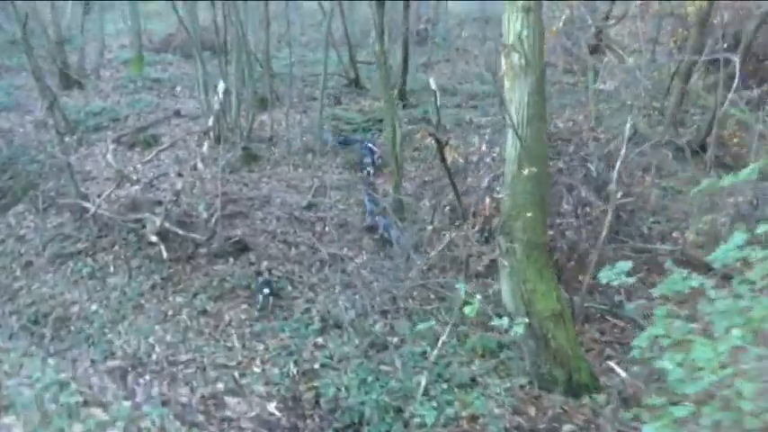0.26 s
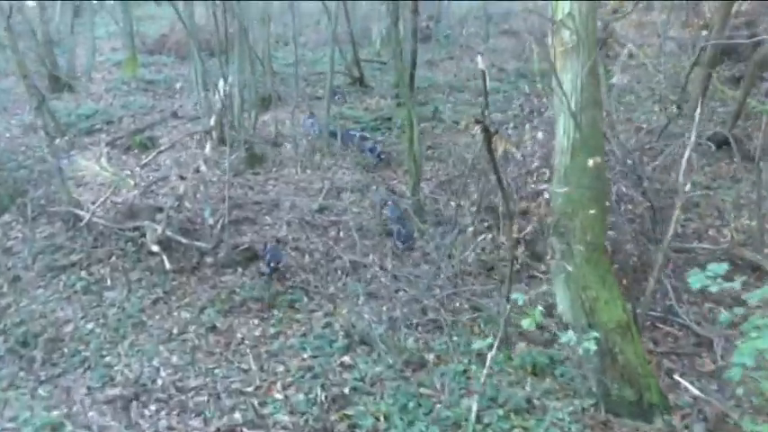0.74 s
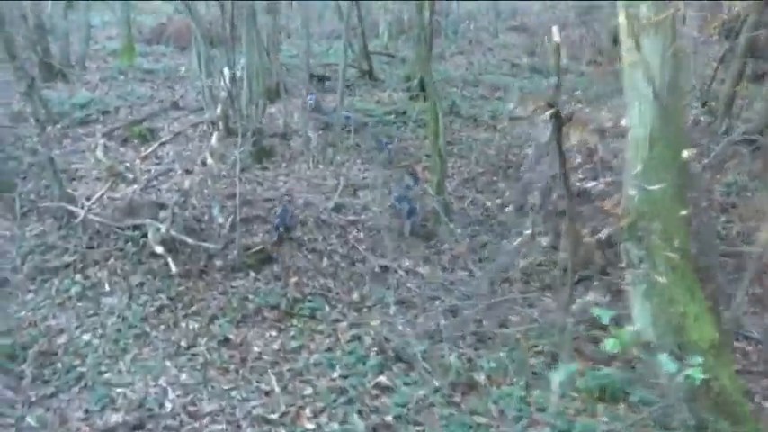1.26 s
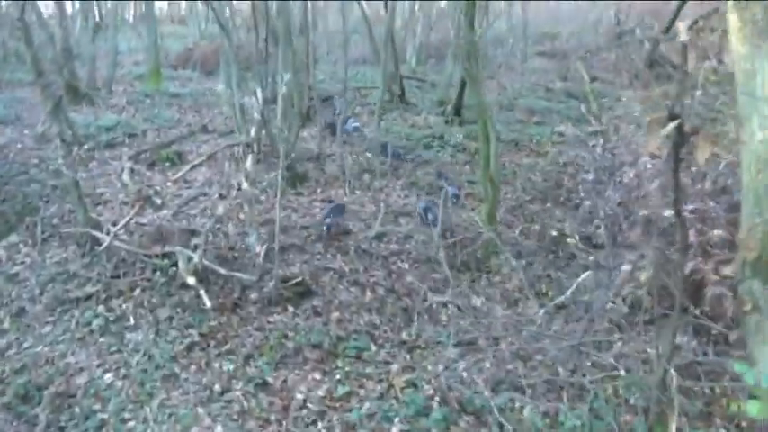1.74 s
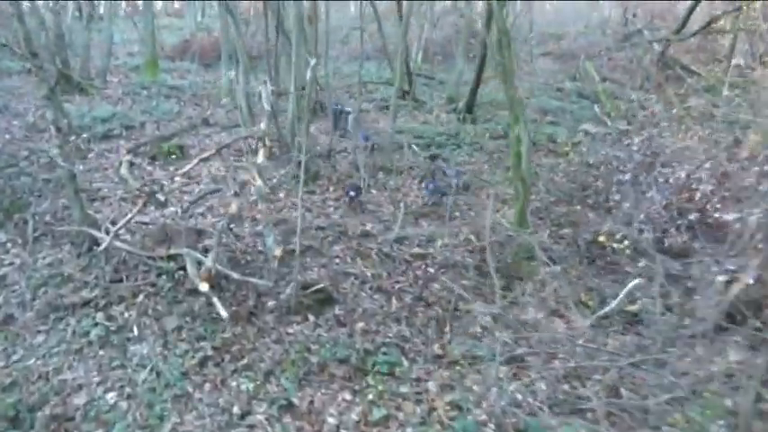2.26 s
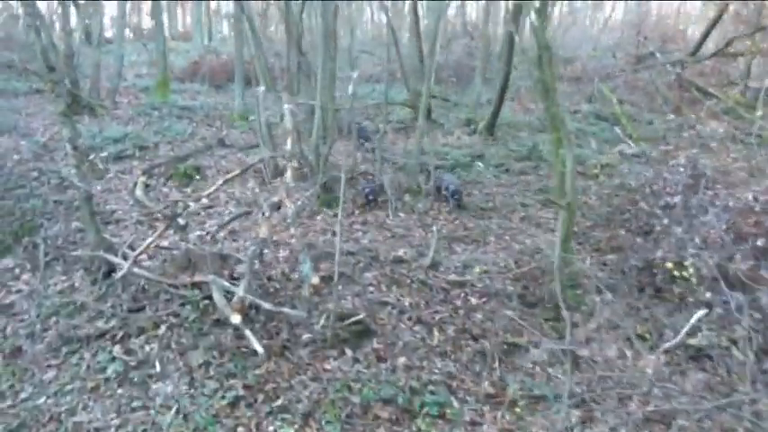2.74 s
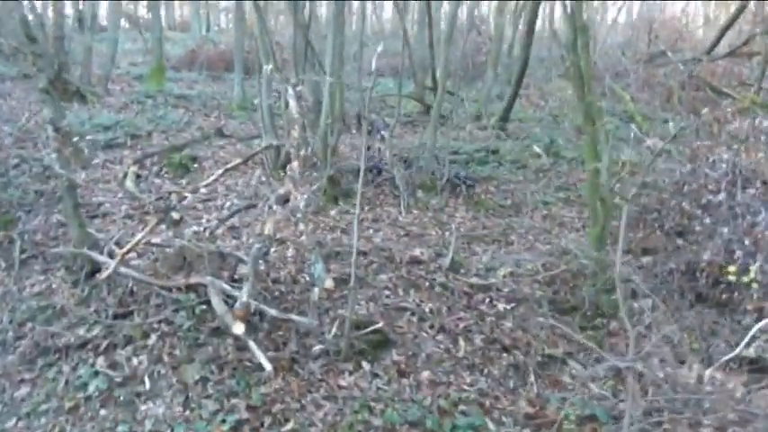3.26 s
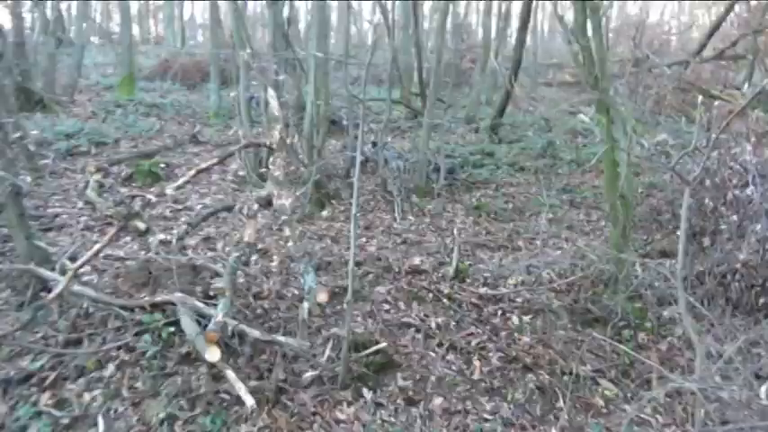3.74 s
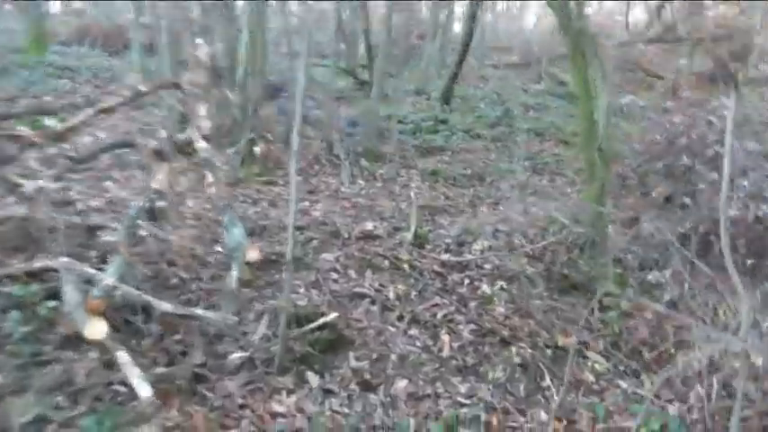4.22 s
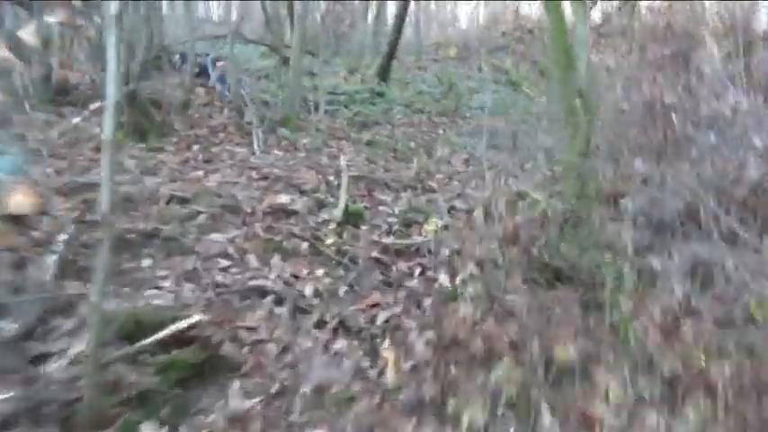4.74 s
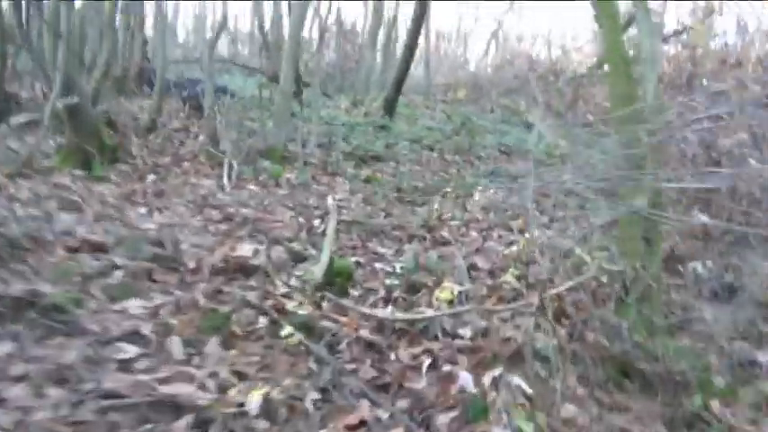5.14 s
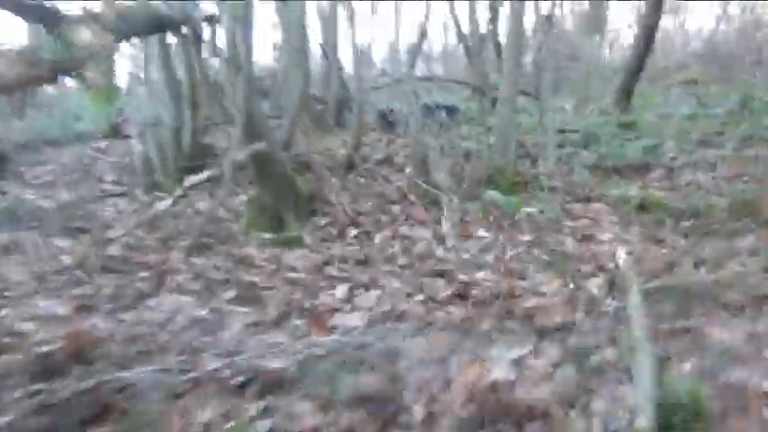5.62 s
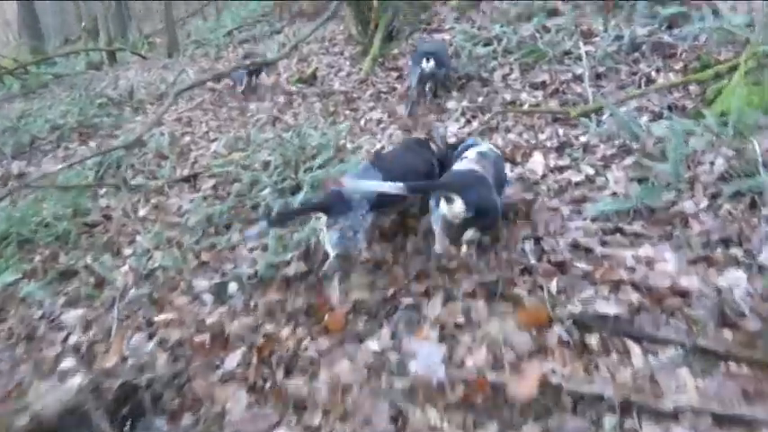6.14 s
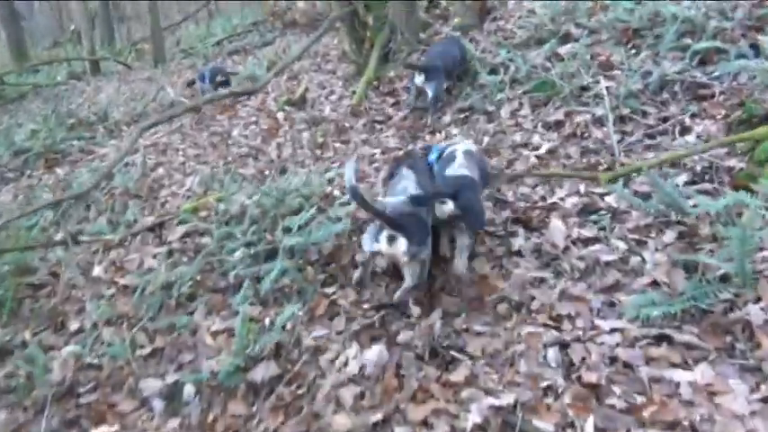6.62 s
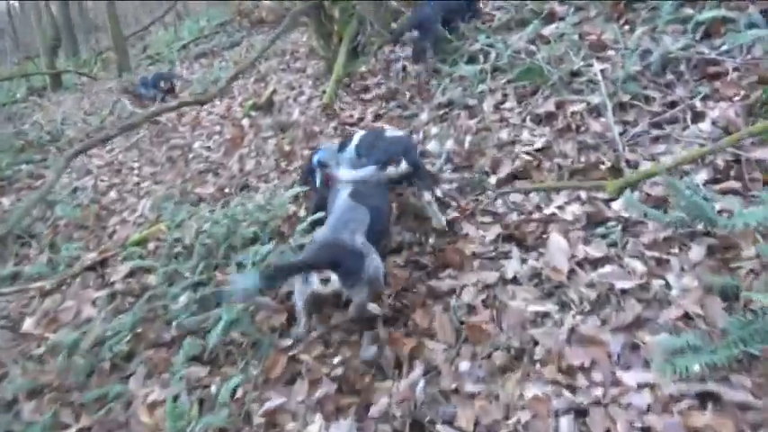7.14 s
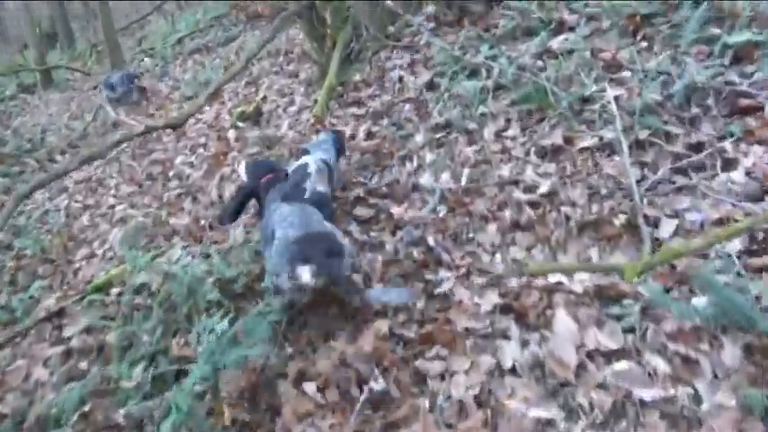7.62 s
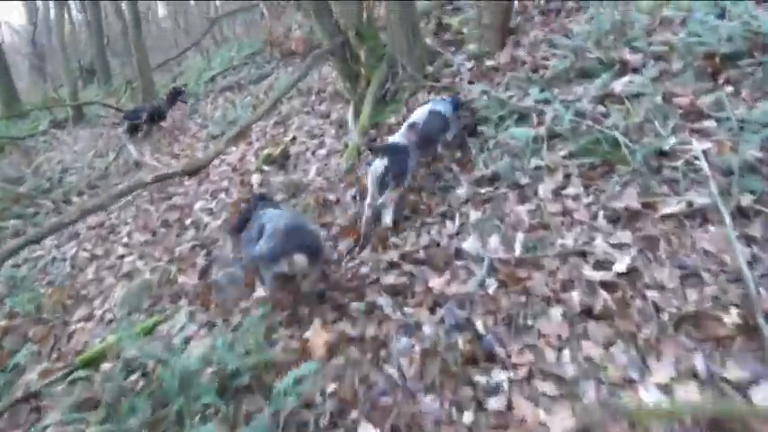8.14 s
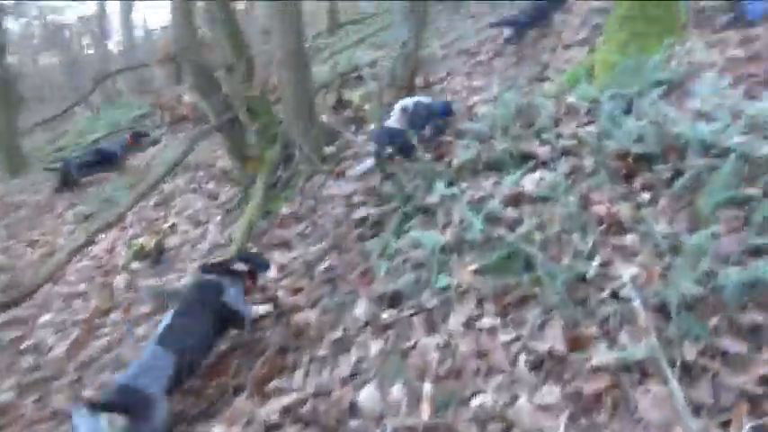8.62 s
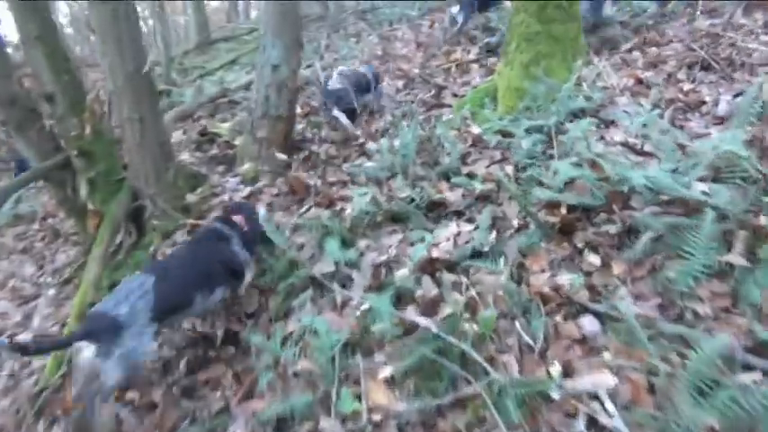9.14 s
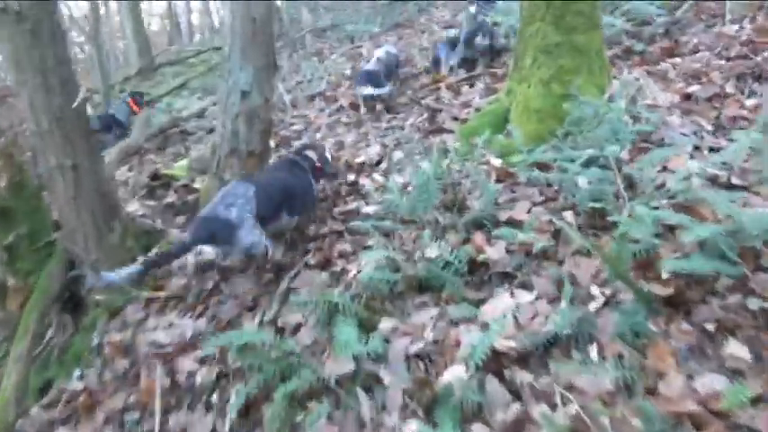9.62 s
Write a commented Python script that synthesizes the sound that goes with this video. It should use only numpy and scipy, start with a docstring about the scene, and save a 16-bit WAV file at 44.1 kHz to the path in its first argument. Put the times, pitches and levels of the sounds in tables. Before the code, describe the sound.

A pack of hounds bays ahead in a wood, short hoarse howls overlapping with higher cries and echoing among the trunks. One hound gives a rough growling bay. The voices then mostly pause as boots crunch dry leaves and snap twigs close to the microphone. A nearer hound holds one long note, and the pack starts up again. Collar bells jingle faintly throughout.

```python
"""Hounds hunting in a wood

A pack bays in overlapping howls and cries, hoarse where the vocal folds repeat only every few cycles.
One hound growls; later one holds a long note. Clappers ring the collar bells, leaves rustle and twigs
snap under paws and boots, and the trunks scatter the voices. The sound cuts out once, briefly."""
import sys
import numpy as np
from scipy import signal
from scipy.fft import rfft, irfft, next_fast_len
from scipy.io import wavfile
from scipy.ndimage import uniform_filter1d, minimum_filter1d, map_coordinates

SR = 44100
rng = np.random.default_rng(int(sys.argv[2]) if len(sys.argv) > 2 else 0)


def output_pcm(signal):
    """Save a mono or channel-first signal as 16-bit PCM at the path in sys.argv[1].

    Samples are clipped to [-1, 1] before scaling.
    """
    pcm = np.clip(np.atleast_2d(signal).T, -1, 1) * 32767
    wavfile.write(sys.argv[1], SR, np.round(pcm).astype(np.int16))


N = 435266

# low howls: t/s, length/s, start, middle, end f/Hz, fundamental/dB, swell/dB, octave/dB,
# overtones/dB, roughness
HOWLS = [(0, 0.24, 460.4, 432.7, 405, -14.5, -13, -31.5, -36.5, 0.55),
         (0.17, 0.34, 389, 385.2, 386.5, -26.5, -8, -20.5, -31, 0.27),
         (0.48, 0.2, 384.3, 408.3, 437, -22.5, -1.5, -46, -36, 1),
         (0.63, 0.27, 458.5, 496.5, 438, -22.5, -13, -38, -45, 0.98),
         (0.72, 0.36, 371.6, 347.6, 401, -36.5, 8.5, -25, -41, 0.44),
         (0.86, 0.4, 452.7, 493.5, 447, -20.5, -6, -36, -32, 0.32),
         (1.27, 0.19, 461, 405.3, 342, -34.5, 4, -49, -30, 0.64),
         (1.5, 0.32, 455.3, 427.5, 392.5, -19, -1, -46, -31, 0.51),
         (1.77, 0.21, 476, 489.6, 430, -19.5, -12, -33.5, -39, 0.58),
         (2.02, 0.19, 481.4, 436, 420, -19, 4.5, -32, -31, 0.76),
         (2.2, 0.38, 459.6, 469.5, 483.4, -20, 5.5, -47.5, -34, 0.99),
         (2.67, 0.26, 526, 507.5, 493, -21, 5.5, -37, -33, 0.64),
         (2.91, 0.14, 448.5, 500.5, 538, -21, 1, -26, -47, 0.98),
         (3.03, 0.27, 478.5, 468, 456, -19.5, -6, -39, -40, 0.66),
         (3.26, 0.18, 486, 474, 444, -16, -4.5, -57, -34.5, 0.43),
         (3.41, 0.23, 428, 445.2, 439, -19, -0.5, -46, -32.5, 0.63),
         (3.61, 0.2, 411, 377, 405, -28.5, 0.5, -20.5, -37.5, 0.23),
         (3.8, 0.156, 442, 453.6, 451, -29, 13, -29.5, -40, 0.45),
         (3.93, 0.18, 394, 420.3, 429, -28.5, -15, -30.5, -38, 0.41),
         (5.82, 0.085, 486, 476, 482, -13.5, 5.5, -24.5, -19.5, 0.021),
         (8.68, 0.42, 440, 391.5, 354, -18.5, -19, -39, -33.5, 0.55),
         (9.0, 0.19, 372.8, 386.3, 420, -26, 21, -46, -34, 0.77),
         (9.15, 0.18, 400, 435.4, 398, -15, 2, -23.5, -40, 1),
         (9.3, 0.15, 419, 416.7, 397, -9, 4.5, -30, -32.5, 0.31),
         (9.461, 0.22, 396, 416.3, 400, -26, 2, -28, -54, 0.93),
         (9.57, 0.23, 412.2, 426, 370.4, -14.5, -9, -32.5, -35.5, 0.37)]
# vocal tract response: f/Hz, gain/dB
THROAT = [(200, -49), (300, -16.5), (400, 2.5), (600, 4), (880, -1), (1030, -4.5), (1200, -6), (1450, -9),
          (1700, -10.5), (2000, -15.5), (2400, -27.5), (3000, -38.5), (3700, -39), (4500, -29), (6000, -47)]
# short hoarse bays: t/s, nominal length/s, start f/Hz, end f/Hz, relative level/dB, roughness
BAYS = [(0.03, 0.17, 530.4, 467, -31.5, 1), (0.844, 0.14, 411, 428.5, -26.5, 0.83),
        (1.136, 0.12, 544.6, 576, -28, 0.86), (1.293, 0.097, 554.4, 605, -25, 1.23),
        (1.376, 0.13, 660.4, 530.3, -22, 0.96), (1.755, 0.12, 460, 430, -26.5, 0.4),
        (1.906, 0.11, 515, 478, -26.5, 0.5), (2.018, 0.21, 566, 527.4, -29, 0.57),
        (2.392, 0.23, 554, 616.6, -27, 0.62), (2.575, 0.12, 603.4, 556.5, -24.5, 0.12),
        (2.831, 0.11, 474, 455, -30.5, 0.97), (2.94, 0.11, 472.7, 528, -29.5, 0.97),
        (3.067, 0.2, 570.4, 476.5, -31.5, 0.6), (3.397, 0.19, 462.5, 434.4, -27.5, 1.15),
        (5.88, 0.049, 504, 415, -27.5, 1.1), (6.984, 0.026, 475, 443, -46, 1.1),
        (7.277, .02, 547, 540, -23, .8), (7.499, 0.12, 698, 477, -21, 1.16),
        (7.63, 0.094, 518, 496, -25.5, 0.8), (8.019, 0.17, 555.6, 511.6, -24.5, 1),
        (8.708, 0.034, 460, 450, -18.5, 1.15), (8.767, 0.18, 460.2, 450, -28, 0.7),
        (9.172, 0.077, 494.6, 449, -21, 1.18), (9.548, 0.28, 530.3, 481.4, -29.5, 0.75)]
# higher cries: t/s, length/s, start, middle, end f/Hz, fundamental/dB, swell/dB, octave/dB
CRIES = [(0.36, 0.15, 504.4, 526.6, 453, -18.5, 12, -30), (1.1, 0.13, 580.5, 636, 665, -18.5, 9, -36),
         (1.38, 0.17, 633.5, 589.7, 484, -17.5, 4, -41.5), (1.89, 0.13, 652, 601, 548.4, -21, -3, -31),
         (1.99, 0.16, 564, 569, 576, -19, -7, -28), (2.21, 0.17, 489, 534, 553, -17, -4, -45),
         (2.37, 0.25, 546, 580.4, 564, -16, 1, -39.5), (2.55, 0.14, 589, 586, 540, -13, 6, -33.5),
         (3.1, 0.15, 625, 557, 496, -20.5, 3, -56), (3.79, 0.19, 509.6, 509, 458, -22, 4, -42),
         (4.011, 0.084, 453, 483.7, 450, -22.5, 3, -43), (8.646, 0.082, 512, 472, 445, -15, -2, -23),
         (8.719, 0.37, 440, 481.7, 552.5, -21.5, -22, -28.5), (9.18, 0.12, 439, 470, 477, -14, 1, -37),
         (9.27, 0.12, 653, 707, 842, -16.5, -9, -52), (9.461, 0.11, 504, 538, 530, -22, -5, -40.5),
         (9.56, 0.2, 553.5, 485, 499.5, -15, 5, -27.5), (9.77, 0.12, 488, 476, 447, -22, -2, -31)]
# growling bay: t/s, f/Hz, fundamental/dB, rattle/dB
GROWL = [(4.39, 444, -28, -43), (4.432, 569.5, -33, -21.5), (4.48, 586, -10.5, -13.5),
         (4.58, 569, -17, -11.5), (4.592, 522.7, -13, -12.5), (4.962, 451.6, -37, -16),
         (5.03, 502.7, -10.5, -12), (5.065, 480, -25, -26)]
# effort in the growl: t/s, roughness, jaw opening, rattle share
GROWL_EFFORT = [(4.4, 1.3, 0.84, 0.7), (4.6, 0.88, 0.7, 0.98), (4.78, 1.1, 0.4, 0.84), (4.87, 0.1, 0, 0.45),
                (4.94, .36, 0, 0.73), (5, 0.87, 0.26, 0.75), (5.03, 0.64, 0.7, 0.32)]
# held note: t/s, f/Hz, level/dB
LONG_HOWL = [(7.291, 378.3, -18), (7.33, 377, -10), (7.358, 369.3, -15), (7.372, 403.3, -13),
             (7.41, 413.5, -10.5), (7.47, 399.3, -11), (7.6, 410.8, -14.5), (7.8, 412.4, -13),
             (7.845, 383.6, -14), (7.89, 409.4, -16), (7.96, 380.8, -16), (8.04, 410.2, -14),
             (8.26, 409.3, -11.5), (8.34, 390.7, -17.5), (8.4, 418.5, -12.5), (8.46, 361, -29.5)]
# slight colouring of the far pack: f/Hz, gain/dB
FAR_COLOUR = [(1600, 1), (2300, -0.5), (3200, 1.5)]
# direction of the voices as the listener turns: t/s, left over right/dB
BEARING = [(0, 0.3), (3.8, -0.4), (4.7, 3.5), (5.9, 1.6), (8.3, 2.5), (8.8, 0.5), (9.25, 2.5), (9.8, 1)]
# decay among the trunks: f/Hz, t60/s
WOOD_T60 = [(200, 0.16), (600, 1), (2000, 0.82), (10000, 0.62)]
# echo, stronger when the pack is far: t/s, gain/dB
ECHO_SEND = [(0, -9), (4, -14), (4.6, -12.5), (5.9, -23), (8.3, -17.5), (9.87, -10.5)]

# strides of boots and paws: t/s, length/s, crunch/dB, thud/dB
STEPS = [(0.513, 0.11, -39.5, -50), (0.994, 0.042, -45, -41), (1.077, 0.035, -29, -39.5),
         (1.246, 0.11, -38, -56), (1.354, 0.098, -37.5, -35), (1.977, 0.14, -37, -57),
         (2.62, 0.28, -64.5, -52), (3.455, 0.18, -43.5, -48), (4.306, .16, -32.5, -48),
         (4.494, 0.17, -31.5, -47), (4.845, 0.056, -40, -45), (5.149, 0.072, -33, -51),
         (5.255, 0.052, -25, -43), (5.519, 0.12, -30, -51), (5.605, 0.11, -37, -53),
         (5.852, 0.023, -26.5, -65), (6.353, 0.14, -38, -68), (6.798, 0.15, -38, -88),
         (7.106, 0.21, -34.5, -60), (7.578, 0.23, -38.5, -57), (7.894, 0.3, -37.5, -55),
         (8.596, 0.4, -39, -56), (9.036, 0.14, -34.5, -51), (9.668, 0.022, -59, -40)]
# steady rustle of the trot: t/s, level/dB
TROT_RUSTLE = [(0.0, -44), (9.07, -41), (9.87, -44)]
# rumble between strides: t/s, level/dB
RUMBLE_FLOOR = [(0, -53.5), (2.5, -50), (3.2, -59), (4.5, -55.5), (5.6, -54.5), (6.1, -66), (7.5, -59),
                (9.87, -52)]
# spectra of dry leaves, soil and still air: f/Hz, relative density/dB
LEAF_SPECTRUM = [(150, -24), (270, -18), (360, -2.5), (550, -8.5), (700, -18), (1850, -7), (2860, -9),
                 (3170, -4), (5830, -3.5), (10200, 4.5), (16000, -7)]
SOIL_SPECTRUM = [(12, -56), (20, -7.5), (59, -24.5), (97, -3.5), (141, -9), (260, -3), (340, -62),
                 (570, -120)]
AIR_SPECTRUM = [(35, -60.5), (60, -18), (98, -2.5), (469, 4.5), (1310, 3.5), (2840, 2.5), (5590, -3.5),
                (9790, 7), (13000, -10.5), (16000, -30.5)]
# left-right likeness of the noises: f/Hz, correlation
COHERENCE = [(60, 1), (180, 0.73), (550, 0.87), (1650, 0.94), (4300, 0.81), (15000, 0.8)]
# tilt of leaves breaking close by: f/Hz, gain/dB
BOOT_TILT = [(5000, -4.5), (11000, 1)]
# snapping twigs: t/s, level/dB
SNAPS = [(1.125, -27), (3.4729, -24.5), (4.086, -29), (4.746, -26.5), (4.879, -26.5), (5.171, -22),
         (5.3846, -18), (5.607, -21), (5.6545, -13), (5.6954, -19), (5.709, -15), (5.728, -16),
         (5.753, -16), (5.877, -28), (6.191, -22.5), (6.761, -36), (7.1436, -18.5), (8.292, -22),
         (8.544, -30.5), (9.558, -23.5), (9.7008, -28)]

# modes of collar bells and fittings: f/Hz, level/dB, t60/s
BELL_MODES = [(2743, 4, 0.2), (2913, 6, 0.19), (7315, -1.5, 0.26), (9800, -13, 0.09), (12400, 2.5, 0.17)]
FITTING_MODES = [(6900, -15.5, .2), (9470, 3, 0.12), (13750, -9, .14)]
# hard clapper strokes and clinks of the fittings: t/s, relative level/dB
JINGLES = [(0.5023, -28), (1.1603, -27), (1.5738, -30), (6.787, -36), (7.4709, -35), (7.7944, -26.5),
           (8.0712, -32), (8.198, -32.5), (8.5676, -26.5), (8.97, -32), (9.0485, -30), (9.13, -27)]
CLINKS = [(0.65, -24), (7.409, -16)]

VOWEL_DB, VOWEL_RATE_HZ = 3.2, 9  # partials swell and fade as the mouth moves


def amp(db):
    """Decibels to gain."""
    return 10 ** (np.asarray(db) / 20)


def unit(x):
    """Scale to rms 1."""
    return x / np.sqrt(np.mean(x ** 2) + 1e-20)


def along(points, hz):
    """Read (f/Hz, value) points on a log axis."""
    f, values = np.transpose(points)
    return np.interp(np.log(hz + 1), np.log(f + 1), values)


def curves(rows, t):
    """Each column after the time, read at t."""
    times, *columns = np.transpose(rows)
    return [np.interp(t, times, column) for column in columns]


def wobble(rate_hz, t):
    """Smooth random curve with knots at rate_hz."""
    u = (t - t[0]) * rate_hz
    return map_coordinates(rng.standard_normal(int(u[-1]) + 4), [u])


def flutter(depth, rate_hz, t):
    """Uneven gain around 1."""
    return 1 + depth * np.tanh(wobble(rate_hz, t))


def filtered(x, response):
    """Apply a gain given as a function of frequency."""
    n = x.shape[-1]
    size = next_fast_len(n + 8192)
    return irfft(rfft(x, size) * response(np.fft.rfftfreq(size, 1 / SR)), size)[..., :n]


def add(track, at_s, x):
    """Mix x into the track from at_s."""
    part = track[..., max(round(at_s * SR), 0):][..., :x.shape[-1]]
    part += x[..., :part.shape[-1]]


def spread(pair, spectrum):
    """Two independent signals to coloured, partly coherent stereo of rms 1."""
    def response(hz):
        angle = np.arccos(np.clip(along(COHERENCE, hz), -1, 1)) / 2
        return amp(along(spectrum, hz)) * [np.cos(angle), np.sin(angle)]
    mid, side = filtered(pair, response)
    return unit(np.array([mid + side, mid - side]))


def span(rows, ramp_s=0.0051):
    """Sample times and on-off gate of a tabulated call."""
    t = np.arange(rows[0][0], rows[-1][0], 1 / SR)
    return t, np.clip(np.minimum(t - t[0], t[-1] - t) / ramp_s, 0, 1)


def call(length_s, pitches_hz, swell_db, attack_s=0.029, release_s=0.031):
    """Times, pitch parabola through three values, and swelling or fading envelope of one call."""
    t = np.arange(0, length_s, 1 / SR)
    u = t / length_s
    pitch_hz = np.polyval(np.polyfit([0, .5, 1], pitches_hz, 2), u)
    gate = np.clip(np.minimum(t / attack_s, (length_s - t) / release_s), 0, 1)
    return t, pitch_hz, gate * amp(swell_db * (u - .5))


def folds(pitch_hz, rough, t, waver, jitter):
    """Vocal fold phase: a waver, plus fast jitter when hoarse."""
    hz = pitch_hz * (1 + waver * wobble(44.74, t) + jitter * rough * wobble(420, t))
    return 2 * np.pi * np.cumsum(hz) / SR


def clear_voice(phase, pitch_hz, t, rolloff_db=0):
    """Harmonics 3-7, shaped by throat and moving mouth; rms about 1."""
    k = np.arange(3, 8)[:, None]
    gain = amp(along(THROAT, k * pitch_hz) - rolloff_db * k)
    vowel = amp([VOWEL_DB * wobble(VOWEL_RATE_HZ, t) for _ in k])
    shiver = .55 * np.array([wobble(90, t) for _ in k])
    harmonics = (vowel * gain * np.sin(k * phase + shiver)).sum(0)
    return np.sqrt(2) * harmonics / np.sqrt((gain ** 2).sum(0) + 1e-20)


def hoarse_voice(phase, pitch_hz, rough, t, between_db, cycles):
    """Folds repeat every few cycles, adding partials between the harmonics; breath hisses; rms 1."""
    k = np.arange(cycles // 2 + 1, 6 * cycles + 1)[:, None] / cycles
    gain = amp(along(THROAT, k * pitch_hz * rng.normal(1, 0.049)) + between_db * (k % 1 > 0))
    gain *= amp([VOWEL_DB * wobble(VOWEL_RATE_HZ, t) for _ in k])
    shiver = np.array([wobble(54.55, t) + 1j * wobble(54.63, t) for _ in k])
    steady = np.exp(1j * rng.standard_normal(k.shape))
    phasors = np.sqrt(1 - rough) * steady + np.sqrt(rough / 2) * shiver
    partials = (gain * phasors * np.exp(1j * k * phase)).real.sum(0)
    puffs = rng.standard_normal(len(t)) * (1 + 0.18 * np.cos(phase / cycles))
    breath = unit(filtered(puffs, lambda hz: amp(along(THROAT, hz))))
    return unit(unit(partials) + .22 * rough * breath)


def howl(t, pitch_hz, first_db, octave_db, upper_db, rough, hoarse_db, rolloff_db=0):
    """Two low harmonics under an upper voice; roughness blends it from clear to hoarse."""
    phase = folds(pitch_hz, rough, t, waver=.012, jitter=.035)
    low = np.sqrt(2) * (amp(first_db) * np.sin(phase) + amp(octave_db) * np.sin(2 * phase))
    low *= flutter(.7 * rough, 110, t) * flutter(.25, 25, t)
    clear = np.sqrt(1 - rough) * clear_voice(phase, pitch_hz, t, rolloff_db)
    hoarse = rough * hoarse_voice(phase, pitch_hz, .8, t, between_db=-2, cycles=3)
    return low + amp(upper_db - 5) * clear + amp(upper_db + hoarse_db) * hoarse


def lead_hound():
    """Low howls in close succession."""
    out = np.zeros(N)
    for at_s, length_s, *pitches_hz, first_db, swell_db, octave_db, upper_db, rough in HOWLS:
        t, pitch_hz, envelope = call(length_s, pitches_hz, swell_db)
        voice = howl(t, pitch_hz, first_db, octave_db, upper_db, rough, hoarse_db=14.5)
        add(out, at_s, envelope * voice)
    return out


def ground(grains_per_s=600, grain_tau_s=.0005):
    """Dry leaves crackle in clumps over thudding soil and still forest air."""
    t = np.arange(N) / SR
    noise = lambda: rng.standard_normal((2, N))
    trot_db, rumble_db = curves(TROT_RUSTLE, t) + curves(RUMBLE_FLOOR, t)
    crunch, thud = strides()
    patter = amp(trot_db + 2.4 * wobble(12, t))
    cracks = (rng.random(N) < grains_per_s / SR) * amp(3.1 * rng.exponential(size=N).clip(0, 3))
    grain_envelope = signal.lfilter([1], [1, -np.exp(-1 / (grain_tau_s * SR))], cracks)
    crackle = unit(grain_envelope * noise()) + 1.1 * noise()
    clumps = amp(2.2 * wobble(70, t))
    leaves = spread(crackle * clumps, LEAF_SPECTRUM)
    soil = spread(noise(), SOIL_SPECTRUM) * amp(3.8 * wobble(17, t))
    air = amp(-46) * spread(noise(), AIR_SPECTRUM)
    return np.hypot(crunch, patter) * leaves + np.hypot(thud, amp(rumble_db)) * soil + air


def bays(attack_s=0.016, release_s=0.025, gain_db=10, fade_db=2, arch=0.038):
    """Period-doubled bays burst out, arch in pitch and fade."""
    out = np.zeros(N)
    for at_s, length_s, start_hz, end_hz, db, rough in BAYS:
        t = np.arange(0, length_s + 0.0178, 1 / SR)
        u, rough = t / t[-1], min(rough, 1)
        pitch_hz = (start_hz + (end_hz - start_hz) * u) * (1 + arch * (np.sin(np.pi * u) - .5))
        gate = np.clip(np.minimum(t / attack_s, (t[-1] - t) / release_s), 0, 1)
        phase = folds(pitch_hz, rough, t, waver=0.012, jitter=0.051)
        voice = hoarse_voice(phase, pitch_hz, rough, t, between_db=-7, cycles=2)
        add(out, at_s, amp(db + gain_db - fade_db * u) * gate * voice)
    return out


def pack_cries():
    """Other hounds throw in higher cries, roughened by fold jitter."""
    out = np.zeros(N)
    for at_s, length_s, *pitches_hz, first_db, swell_db, octave_db in CRIES:
        t, pitch_hz, envelope = call(length_s, pitches_hz, swell_db)
        phase = folds(pitch_hz, 1, t, waver=.008, jitter=.028)
        low = np.sqrt(2) * (amp(first_db) * np.sin(phase) + amp(octave_db) * np.sin(2 * phase))
        upper = amp(octave_db - 6.5) * clear_voice(phase, pitch_hz, t)
        add(out, at_s, envelope * (low + upper) * flutter(0.3, 89.4, t))
    return out


def struck_metal(modes, strokes, top_detune=.005, gain_db=-9):
    """Each stroke rings the modes at new strengths and chatters on the rim."""
    out, t = np.zeros((2, N)), np.arange(SR // 5) / SR
    hz, mode_db, t60_s = np.transpose(modes)[:, :, None]
    for at_s, db in strokes:
        tuning = 1 + top_detune * hz / hz.max() * rng.standard_normal(hz.shape)
        phase = 2 * np.pi * hz * tuning * t + .3 * wobble(170, t)
        ringing = amp(mode_db + rng.normal(0, 4, hz.shape) - 60 * t / t60_s) * np.sin(phase)
        ringing *= (1 - np.exp(-t / .002)) * flutter(.8, 138, t)
        stereo_gains = amp(db + gain_db + rng.normal(0, 2, (2, len(hz))))
        add(out, at_s, stereo_gains @ ringing)
    return out


def collars(soft_count=100, soft_db=-42):
    """The trot keeps the bells jingling softly between hard strokes; fittings clink."""
    soft = [(u * N / SR, soft_db) for u in rng.random(soft_count)]
    return struck_metal(BELL_MODES, list(JINGLES) + soft) + struck_metal(FITTING_MODES, CLINKS)


def strides(attack_s=0.034, settle_tau_s=0.029):
    """Crunch and thud gains: each stride presses leaves and soil, holds and settles."""
    out, t = np.zeros((2, N)), np.arange(SR) / SR
    for at_s, length_s, crunch_db, thud_db in STEPS:
        press = np.minimum(t / attack_s, 1) * np.exp(-np.maximum(t - length_s, 0) / settle_tau_s)
        add(out, at_s, amp([[crunch_db], [thud_db]]) * press)
    return out


def twigs(crack_t60_s=.012, crumble_t60_s=.07):
    """A snap is a short bright crack with a crumbling tail."""
    out, t = np.zeros((2, N)), np.arange(SR // 16) / SR
    for at_s, db in SNAPS:
        burst = spread(rng.standard_normal((2, len(t))), LEAF_SPECTRUM)
        crack = amp(-60 * t / crack_t60_s)
        crumble = amp(-20 - 60 * t / crumble_t60_s + 5 * wobble(500, t))
        add(out, at_s, amp(db) * burst * (crack + crumble))
    return out


def near_boots(litter, from_s=4.2, to_s=5.8, fade_s=.05):
    """Leaves and twigs tilt toward the top treble while boots tread close by."""
    t = np.arange(N) / SR
    near = np.clip(np.minimum(t - from_s, to_s - t) / fade_s, 0, 1)
    tilted = filtered(litter, lambda hz: np.where(hz > 500, amp(along(BOOT_TILT, hz)), 1))
    return litter + near * (tilted - litter)


def growler():
    """Folds lock at a quarter of the pitch and rattle; the jaw closes, then opens on a yelp."""
    out = np.zeros(N)
    t, gate = span(GROWL)
    pitch_hz, first_db, rattle_db = curves(GROWL, t)
    rough, jaw, share = np.clip(curves(GROWL_EFFORT, t), 0, 1)
    phase = folds(pitch_hz, rough, t, waver=.009, jitter=.04)
    voice = hoarse_voice(phase, pitch_hz, rough, t, between_db=-2, cycles=4)
    closed_jaw = [(350, 5), (600, -8), (1150, 6), (1400, -2), (2400, -19)]  # f/Hz, gain/dB
    muffled = filtered(voice, lambda hz: amp(along(closed_jaw, hz)))
    rattle = amp(rattle_db) * share * (jaw * voice + (1 - jaw) * muffled)
    tone = amp(first_db) * (np.sin(phase) + 0.15 * np.sin(2 * phase))
    add(out, t[0], gate * (rattle + tone))
    return out


def long_howl(mouth_hz=765, half_width_hz=28.6, push_s=0.069):
    """A near hound holds a note; as it sags, the octave slips into a mouth resonance and overtones sink."""
    out = np.zeros(N)
    t, gate = span(LONG_HOWL)
    pitch_hz, db = curves(LONG_HOWL, t)
    slip = 1 / (1 + ((2 * pitch_hz - mouth_hz) / half_width_hz) ** 2)
    push = 1 / (1 + ((t - t[0]) / push_s) ** 8)  # bright onset
    octave_ratio_db = -17.5 + 23 * slip
    first_db = db - 10 * np.log10(1 + amp(octave_ratio_db) ** 2)  # the two share the power
    octave_db = first_db + octave_ratio_db
    upper_db = db - 13.5 + 5.5 * push - 11 * slip * (1 - push)
    voice = howl(t, pitch_hz, first_db, octave_db, upper_db, rough=.3, hoarse_db=7, rolloff_db=5.5)
    add(out, t[0], gate * voice)
    return out


def trunks(voices, delay_samples=400):
    """Stereo echo scattered by the trees; lasts longest near 600 Hz."""
    hz, t, spectra = signal.stft(rng.standard_normal((2, SR)), SR, nperseg=256)
    decay = amp(-60 * t / along(WOOD_T60, hz)[:, None])
    common, side = signal.istft(spectra * decay, SR, nperseg=256)[1]
    tail = np.array([common + 0.082 * side, common - 0.6 * side])
    delayed = np.pad(voices, (delay_samples, 0))[None]
    return signal.fftconvolve(delayed, tail / np.linalg.norm(tail[0]), axes=1)[:, :N]


def scene(far_until_s=5.5):
    """Hounds ahead among the trees, bells and leaves around them."""
    t = np.arange(N) / SR
    echo_db, bearing_db = curves(ECHO_SEND, t) + curves(BEARING, t)
    voices = lead_hound() + long_howl() + growler() + pack_cries() + bays()
    far = filtered(voices, lambda hz: amp(along(FAR_COLOUR, hz)))
    voices = np.where(t < far_until_s, far, voices)
    direct = voices * amp([bearing_db / 2, -bearing_db / 2])
    echo = trunks(amp(echo_db) * voices)
    bells = collars()
    litter = near_boots(ground() + twigs()) * amp([[.6], [-.6]])  # slightly left
    return direct + echo + bells + litter


def record(dry, ceiling=.92, mute_from_s=5.778, mute_to_s=5.825, top_hz=16000):
    """Peak limiter, brief dropout, band limit."""
    t = np.arange(N) / SR
    needed = np.minimum(1, ceiling / (np.abs(dry).max(0) + 1e-9))
    gain = uniform_filter1d(minimum_filter1d(needed, size=600), size=500)
    audible = (t < mute_from_s) | (t > mute_to_s)
    return filtered(dry * gain * audible, lambda hz: hz < top_hz)


dry = scene()
out = record(dry)
output_pcm(out)
```